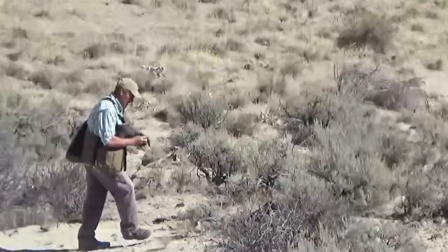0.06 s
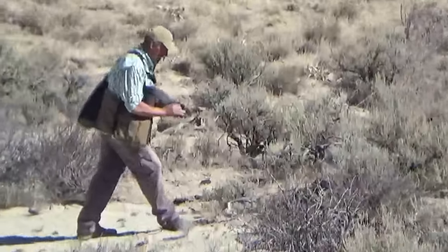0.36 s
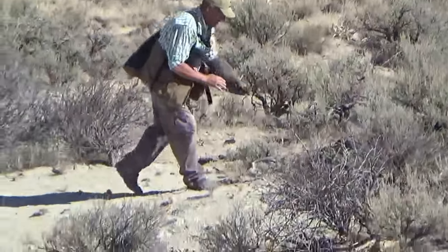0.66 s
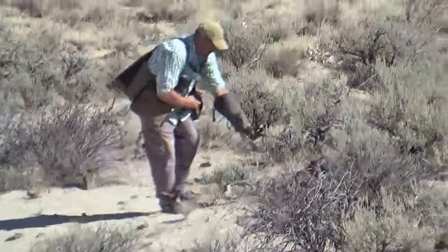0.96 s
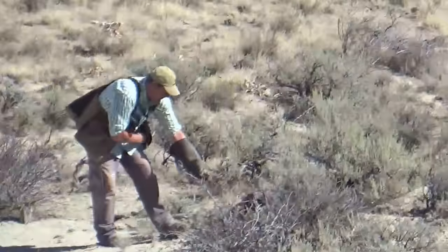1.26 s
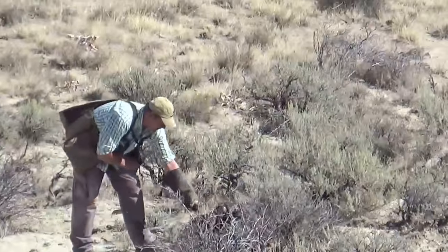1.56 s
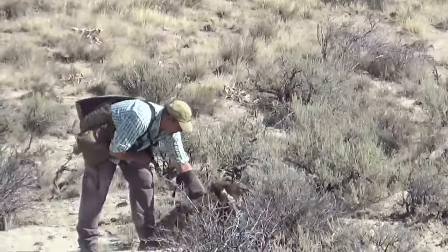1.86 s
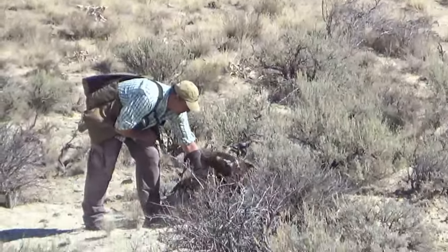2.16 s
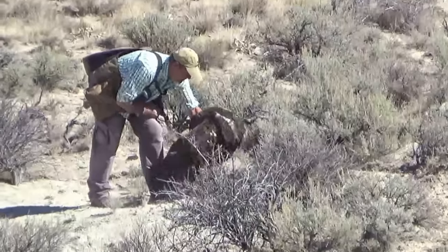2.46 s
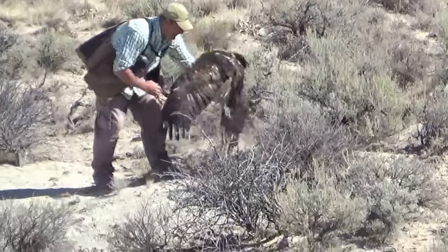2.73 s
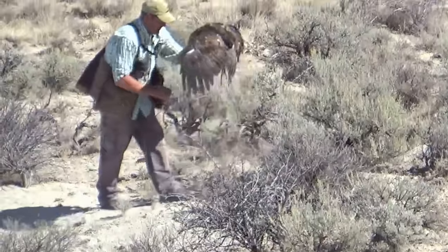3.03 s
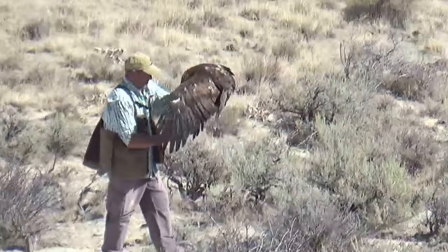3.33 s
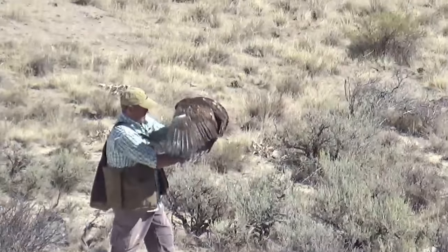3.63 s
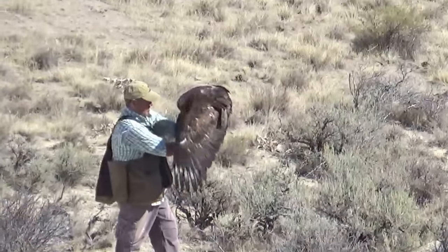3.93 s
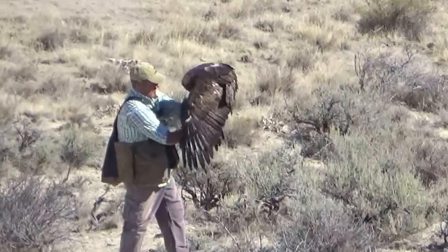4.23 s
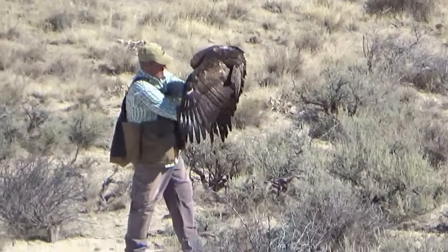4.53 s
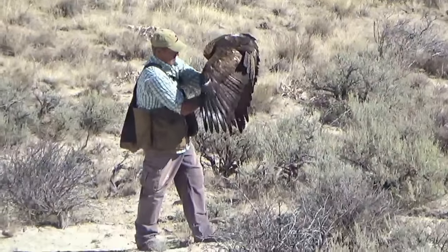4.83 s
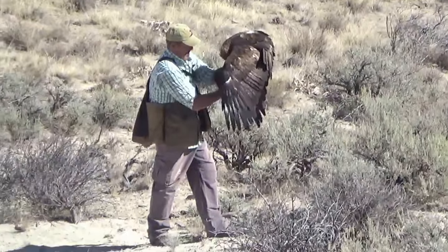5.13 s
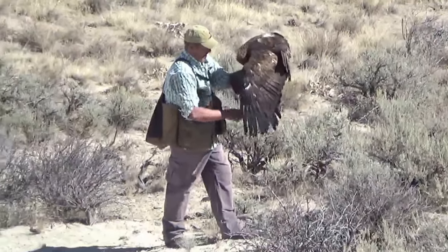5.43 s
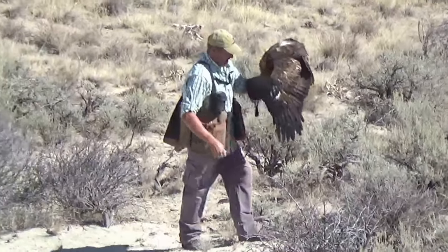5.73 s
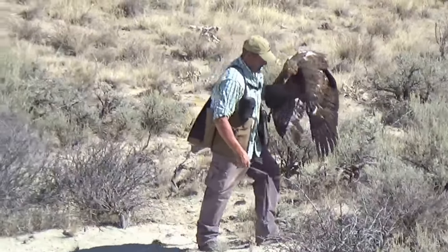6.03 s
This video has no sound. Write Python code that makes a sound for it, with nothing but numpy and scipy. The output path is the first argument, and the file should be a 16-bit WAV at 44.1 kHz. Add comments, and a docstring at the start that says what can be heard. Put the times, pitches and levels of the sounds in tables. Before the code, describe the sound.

On an open hillside, an eagle some way ahead gives a string of thin, rising whistles, sometimes hoarse, most breaking into a short two-step yelp or a few squeals. Gusts rumble and thump unevenly on the close stereo microphone over a soft hiss of open air. Toward the end, feathers rustle against dry brush and twigs tick and snap, and one hard click sounds right at the microphone.

```python
"""An eagle calls as it is lifted out of dry sagebrush, some way off on an open hillside.
Its syrinx gives thin whistles that scoop up and climb, hoarse at times, then break into a two-step
yelp or a few squeals. The bird is straight ahead; twigs snap, and feathers rustle against the brush.
Up close, gusts buffet the spaced ports of the stereo microphone, and one hard click comes at the end.
Behind it all lie the hiss of open air and a faint pulsing swish."""
import sys
import numpy as np
from scipy import signal
from scipy.fft import rfft, irfft
from scipy.io import wavfile

SR = 44100
rng = np.random.default_rng(int(sys.argv[2]) if len(sys.argv) > 2 else 0)


def wav_out(sig):
    """Save sig, one row per channel (or a flat mono array), as 16-bit PCM at SR to the path in sys.argv[1]."""
    wavfile.write(sys.argv[1], SR, np.round(np.clip(np.atleast_2d(sig).T, -1, 1) * 32767).astype(np.int16))


N = 268642
TIME = np.arange(N) / SR
BINS = np.maximum(np.arange(N // 2 + 1) * SR / N, 1)

# Levels in the tables are relative: each source adds its own gain.
# the eagle's whistles: start t/s, end t/s, first f/Hz, middle f/Hz, last f/Hz, waver depth/Hz,
# first level/dB, crest t/s, crest level/dB, last level/dB, first and last roughness/0-1
WHISTLES = [ (-0.1, 0.078, 3470, 3920, 4400, -5, -52, .01, -51, -51, 0, 0.23),
            (0.445, 0.757, 3260, 3440, 3950, -4, -60, 0.6, -49, -44, 0.1, 0.06),
            (1.074, 1.399, 3485, 3740, 4280, 0, -49, 1.36, -47, -47, 0, 0.16),
            (1.699, 1.995, 3890, 4450, 4060, 229, -51, 1.915, -36.5, -37, 0.4, 0),
            (2.263, 2.551, 3830, 4465, 4390, 52, -41.5, 2.37, -43.5, -48, 0.1, 0.37),
            (2.912, 3.206, 3440, 3966, 4610, 0, -44.5, 3.1, -39.5, -38.5, 0.04, .2),
            (3.532, 3.754, 3320, 3530, 3880, 0, -59.5, 3.69, -37, -36.5, 0.1, 0),
            (4.224, 4.524, 3300, 3693, 4270, 0, -59.5, 4.35, -41.5, -48.5, .04, 0.1),
            (5.053, 5.201, 3500, 3890, 4080, 0, -57, 5.15, -55, -55, 0.14, 0.2)]
# resonance of the throat and open bill: f/Hz, gain/dB
THROAT = [(900, -14), (1400, 0), (2300, 1), (3100, 0), (4200, -0.5), (5200, -11.5), (6800, -22),
          (9000, -21), (11000, -53)]
# two-step yelps: t/s, upper step f/Hz, its fall/Hz, its length/s, its level/dB,
# lower step length/s, its level/dB, overtone slope/dB per octave, roughness/0-1
YELPS = [ (0.76, 1978, 40, 0.019, -48, .047, -40.5, -4.5, 0.16),
         (1.412, 2003, 14, .028, -42, 0.044, -41, -2, 0.23),
         (2.011, 1797, 102, .01, -55, .027, -40, -2.5, 0.18),
         (3.224, 2274, 60, 0.034, -30, 0.024, -31, -4, 0.1),
         (4.539, 2279, -37, 0.048, -33.5, 0.0318, -39, -3.5, .12),
         (5.333, 2285, 352, 0.024, -41.5, 0.024, -50, 2.5, 0.15)]
# squeals and stray short notes: start t/s, end t/s, first f/Hz, last f/Hz, level/dB,
# overtone slope/dB per octave, roughness/0-1
SQUEALS = [ (0.094, 0.143, 2970, 2510, -48, 0, 0.37), (2.041, 2.062, 1136, 1036, -45, -6, 0.68),
           (2.557, 2.589, 3580, 3820, -47.5, -3, 0.36), (2.598, 2.621, 3310, 3360, -37, -11, 0.24),
           (2.624, 2.643, 3090, 2900, -29.5, -10, .08), (3.758, 3.814, 3550, 3330, -44.5, -11, 0.76),
           (3.818, 3.857, 3150, 3270, -43, -6, 0.48), (3.867, 3.884, 3295, 3280, -31, -17, 0.17),
           (3.866, 3.878, 2460, 2480, -45, -8, .05), (3.889, 3.903, 3270, 2780, -27, -8, 0.14),
           (3.912, 3.935, 2644, 2215, -25.5, -9, 0.13), (4.773, 4.796, 4880, 4740, -27.5, -3, .1),
           (4.969, 5.016, 4440, 4530, -53, 14, 0.3), (5.139, 5.191, 4600, 4560, -44.5, 10, 0.56),
           (5.237, 5.279, 4440, 4260, -37.5, -17, 0.08), (5.289, 5.326, 3090, 3075, -44.5, 0, .2),
           (5.367, 5.396, 1130, 1050, -38.5, -25, 0.74)]
# returns from ground and bushes: delay/s, level/dB
ECHOES = [(.0012, -17.5), (0.01, -16), (0.038, -40)]
# wind on the microphone: t/s, rumble level/dB, flutter level/dB
GUSTS = [(0.0, -36, -47), (0.2, -40.5, -68), (0.33, -32, -60), (0.78, -32, -46.5), (1.02, -43.5, -54),
         (1.17, -36.5, -42), (1.4, -41.5, -51), (1.52, -49.5, -60), (2.15, -48.5, -75), (2.25, -37, -68),
         (2.75, -36, -49), (3.35, -37, -36.5), (3.68, -31.5, -50.5), (3.8, -42, -53), (4.1, -47.5, -48),
         (4.48, -46, -48), (4.8, -37, -44), (5.16, -36, -31), (5.23, -42.5, -42.5), (5.38, -40.5, -79),
         (5.49, -28, -38), (5.76, -32.5, -29.5), (6.07, -40, -41)]
# the strongest buffets: t/s, peak level/dB, centre f/Hz
BUFFETS = [(0.303, -15.5, 244), (0.67, -14, 192), (0.956, -21.5, 167), (1.135, -21, 216), (1.223, -21, 190),
           (1.278, -22.5, 202), (1.645, -24.5, 166), (2.342, -22, 151), (2.429, -24, 160),
           (2.53, -17.5, 262), (2.696, -11, 228), (2.708, -18, 257), (2.786, -19, 189), (2.968, -20, 218),
           (3.241, -18, 260), (3.299, -18.5, 323), (3.432, -20.5, 266), (4.59, -19.5, 193),
           (4.644, -19.5, 250), (4.749, -10, 251), (4.896, -19, 282), (4.957, -20, 257), (5.052, -17, 287),
           (5.105, -16, 390), (5.148, -14.5, 287), (5.48, -18, 183), (5.505, -15, 214), (5.681, -11, 252),
           (5.731, -14, 298), (5.767, -14.5, 252), (5.898, -18.5, 285), (5.942, -15.5, 280)]
# spectra of large, middling and small eddies: f/Hz, level/dB
SWELL_SPECTRUM = [(10, 2), (25, -5.5), (60, 9), (90, 5), (140, -9), (300, -82)]
RUMBLE_SPECTRUM = [(20, -27), (55, -17.5), (90, 0.5), (130, 0), (190, -2.5), (280, -13), (420, -21.5),
                   (800, -70)]
FLUTTER_SPECTRUM = [(120, -10), (220, 6.5), (320, 5.5), (500, -6), (800, -12), (1400, -23), (2500, -31.5),
                    (5000, -52)]
# wind at the left port against the right: f/Hz, phase/rad
PORT_PHASE = [(30, 0.29), (80, 0.72), (170, -1.05), (330, -1.32), (600, -1.8), (1300, -1.86), (2500, -0.69)]
# likeness of left and right, for wind and for airborne sound: f/Hz, correlation/0-1
WIND_LIKENESS = [(30, 0.86), (250, 0.92), (2000, 0.56)]
AIR_LIKENESS = [(400, 0.27), (1200, 0.55), (3000, 0.45), (10000, 0.82)]
# spectra of open air, the background swish and dry brush: f/Hz, level/dB
AIR_SPECTRUM = [(400, 0), (700, -4), (1000, -5.5), (1600, -9.5), (2500, -11.5), (4000, -12.5), (6300, -16),
                (8000, -17.5), (10500, -19.5), (12000, -30)]
SWISH_SPECTRUM = [(400, -25), (700, 4.5), (1000, 7), (1700, 8), (2300, -2), (4000, -59)]
BRUSH_SPECTRUM = [(1000, -19), (2500, 7.5), (5000, 8), (8000, 6), (10500, 11), (12000, 13.5)]
# twigs snapping: t/s, level/dB
SNAPS = [(0.1556, -30.5), (0.1584, -32.5), (0.269, -48), (5.835, -43)]
# ring of a snapped twig: f/Hz, level/dB, t60/s
SNAP_MODES = [(1034, 1, 0.055), (1480, 10.5, 0.006), (1643, 1.5, 0.054), (2053, 7.5, 0.026),
              (2670, 2, 0.017), (3060, 1, 0.014), (3880, 2, 0.015), (5680, -7.5, 0.025)]
# feathers rubbing on brush: t/s, level/dB
RUSTLE = [(4.55, -61), (4.76, -53.5), (5.1, -59), (5.165, -45), (5.24, -48), (5.5, -60), (5.62, -50),
          (5.85, -50.5), (6.05, -51.5)]
# the loudest twig ticks: t/s, level/dB
TWIG_TICKS = [(5.149, -25.5), (5.605, -25), (5.67, -28.5), (5.7966, -24.5), (5.85, -27), (5.8688, -33)]
# ring of the click at the microphone: f/Hz, level/dB, t60/s
CLICK_MODES = [(2700, -19, .007), (4800, -22, .005), (7600, -23, .004), (10300, -13, .008)]


def from_db(db):
    """Decibels to gain."""
    return 10 ** (np.asarray(db) / 20)


def unit_rms(x):
    """Scale to unit power."""
    return x / np.sqrt(np.mean(x ** 2) + 1e-20)


def in_time(rows, t=TIME):
    """Columns of a curve, joined by straight lines."""
    times, *columns = np.transpose(rows)
    return [np.interp(t, times, column) for column in columns]


def at_hz(points, hz):
    """Read a spectrum on a log-frequency axis."""
    f, value = np.transpose(points)
    return np.interp(np.log(hz), np.log(f), value)


def drift(rate_hz, size=N):
    """Smooth random wander with spread 1."""
    lowpass = signal.butter(2, rate_hz, fs=SR, output="sos")
    return unit_rms(signal.sosfilt(lowpass, rng.standard_normal(size + SR // 10))[-size:])


def stereo_noise(spectrum, likeness):
    """Coloured noise whose two sides are partly alike."""
    mid, side = rfft(rng.standard_normal((2, N)))
    alike = at_hz(likeness, BINS)
    left_right = np.sqrt(1 + alike) * mid + np.sqrt(1 - alike) * side * [[1], [-1]]
    return unit_rms(irfft(left_right * from_db(at_hz(spectrum, BINS)), N))


def gate(t, start, end, edge_s):
    """Smooth opening and closing of a note."""
    return (1 + np.tanh((t - start) / edge_s)) * (1 + np.tanh((end - t) / edge_s)) / 4


def around(start, end, margin_s=.02):
    """Samples of an event with a margin on both sides."""
    return slice(max(int((start - margin_s) * SR), 0), int((end + margin_s) * SR))


def random_times(per_s, count=150):
    """Unevenly spaced moments at a mean rate, each with two random values of spread 1."""
    times = np.cumsum(rng.gamma(2, .5, count)) / per_s
    return [(s, *chance) for s, chance in zip(times, rng.standard_normal((count, 2))) if s < TIME[-1]]


def struck(s, modes):
    """Damped modes ringing out from one instant."""
    out, at = np.zeros(N), int(s * SR)
    t = TIME[:min(SR // 10, N - at)]
    for hz, db, t60 in modes:
        out[at:at + len(t)] += from_db(db - 60 * t / t60) * np.sin(2 * np.pi * (hz * t + rng.random()))
    return out


def syrinx(hz, rough, jitter, shimmer, flutter_hz, rattle=0.18, rattle_hz=76, waver=0.005):
    """Phase and strength of the vibrating membrane; roughness shakes both, at worst into a rattle."""
    size = len(hz)
    shake = rough ** 3 * np.sin(2 * np.pi * (rattle_hz * TIME[:size] + rng.random()))
    bend = jitter * rough * drift(flutter_hz, size) + waver * drift(44.4, size) + rattle * shake
    strength = 1 + shimmer * rough * drift(flutter_hz, size) - shake / 2
    return 2 * np.pi * np.cumsum(hz * (1 + bend)) / SR, unit_rms(strength)


def whistles(gain_db=-1.5, octave_db=-3, octave_follows=0.76, twin_above_hz=375, twin_db=-18):
    """Nearly pure rising tones from the syrinx, with a faint twin and an octave that swells less."""
    scoop_hz, scoop_db, scoop_s = 448, 0.5, .015   # each starts flat and weak, then slides up
    waver_period_s, waver_crest_s = .114, .052
    unsteady_db, unsteady_hz = 2.54, 11
    out = np.zeros(N)
    for (start, end, first_hz, middle_hz, last_hz, waver_hz,
         first_db, crest_s, crest_db, last_db, first_rough, last_rough) in WHISTLES:
        span = around(start, end)
        t = TIME[span]
        age = np.maximum(t - start, 0)
        progress = np.clip(age / (end - start), 0, 1)
        scoop = np.exp(-age / scoop_s)
        climb = (last_hz - first_hz) * (progress - .5)
        arch = ((first_hz + last_hz) / 2 - middle_hz) * (2 * progress - 1) ** 2
        waver = waver_hz * np.cos(2 * np.pi * (age - waver_crest_s) / waver_period_s)
        hz = middle_hz + climb + arch + waver - scoop_hz * scoop
        db = np.interp(t, [start, crest_s, end], [first_db, crest_db, last_db])
        db += unsteady_db * drift(unsteady_hz)[span] - scoop_db * scoop
        rough = first_rough + (last_rough - first_rough) * progress
        phase, strength = syrinx(hz, rough, jitter=0.0285, shimmer=1.7, flutter_hz=223)
        twin_phase, twin_strength = syrinx(hz + twin_above_hz, rough=0.515,
                                           jitter=0.0384, shimmer=2.6, flutter_hz=234)
        overtone_db = db.mean() + octave_follows * (db - db.mean()) + at_hz(THROAT, 2 * hz) + octave_db
        tone = strength * (from_db(db) * np.sin(phase) + from_db(overtone_db) * np.sin(2 * phase))
        twin = twin_strength * from_db(db + twin_db) * np.sin(twin_phase)
        out[span] += from_db(gain_db) * gate(t, start, end, edge_s=0.0015) * (tone + twin)
    return out


def hillside(direct, wet_db=-21, t60=0.14, spread=0.96):
    """Ground and brush send the microphone a few weak echoes and a thin, short tail."""
    t = TIME[:SR // 2]
    decay = rng.standard_normal((2, len(t))) * from_db(-60 * t / t60) * (t > .004)
    mid, side = decay / np.sqrt(np.sum(decay ** 2, axis=1, keepdims=True))
    tail = mid + spread * side * [[1], [-1]]
    echoes = sum(from_db(db) * np.interp(TIME - delay, TIME, direct, left=0) for delay, db in ECHOES)
    return direct + echoes + from_db(wet_db) * signal.fftconvolve(direct[None], tail, axes=1)[:, :N]


def wind(swell_db=-21, swell_follows=0.54, gust_gain_db=2, rumble_lumps_db=3.5, flutter_lumps_db=4):
    """Lumpy turbulence right on the microphone; the spaced ports hear it out of step."""
    rumble_db, flutter_db = in_time(GUSTS)
    lumps = drift(70)
    # the largest eddies roll on even between gusts
    swell = from_db(swell_db + swell_follows * rumble_db) * stereo_noise(SWELL_SPECTRUM, WIND_LIKENESS)
    rumble = unit_rms(stereo_noise(RUMBLE_SPECTRUM, WIND_LIKENESS) * from_db(rumble_lumps_db * lumps))
    flutter = unit_rms(stereo_noise(FLUTTER_SPECTRUM, WIND_LIKENESS) * from_db(flutter_lumps_db * lumps))
    gusts = from_db(gust_gain_db) * (from_db(rumble_db) * rumble + from_db(flutter_db) * flutter)
    port_shift = np.exp(.5j * at_hz(PORT_PHASE, BINS) * [[1], [-1]])
    return irfft(rfft(swell + gusts + buffets()) * port_shift, N)


def eddies(per_s=8.9, over_gust_db=11, scatter_db=1.5, centre_hz=196, spread_octaves=.25):
    """Lesser buffets at random moments, following the strength of the gust that carries them."""
    return [(s, in_time(GUSTS, s)[0] + over_gust_db + scatter_db * size,
             centre_hz * 2 ** (spread_octaves * speed)) for s, size, speed in random_times(per_s)]


def buffets(cycles=1.167, gain_db=0.1, tear=0.27, steepening=0.17, tearing_hz=225):
    """An eddy hits the ports with a swing or two of pressure; small fast ones quicken and tear."""
    out = np.zeros(N)
    torn = stereo_noise(FLUTTER_SPECTRUM, WIND_LIKENESS)[0]
    for (s, db, hz), offset in zip(BUFFETS + eddies(), rng.random(200)):
        span = around(s, s)
        violence = min((hz / tearing_hz) ** 3, 2)
        turns = (TIME[span] - s) * hz
        crest = np.exp(-(turns / cycles) ** 2)
        swing = np.sin(2 * np.pi * (turns + steepening * violence * turns ** 2 + offset))
        out[span] += from_db(db + gain_db) * crest * swing * (1 + tear * violence * torn[span])
    return out


def open_air(level_db=-52.5):
    """The steady, wide hiss of the open hillside."""
    return from_db(level_db) * stereo_noise(AIR_SPECTRUM, AIR_LIKENESS)


def swish(level_db=-55, rate_hz=6.33, crest_s=1.83, sharpness=6.8):
    """A soft midrange hush pulsing in the background."""
    swelling = (1 + np.cos(2 * np.pi * rate_hz * (TIME - crest_s))) / 2
    return from_db(level_db) * swelling ** sharpness * stereo_noise(SWISH_SPECTRUM, AIR_LIKENESS)


def yelp_notes(lower_ratio=.68, overlap_s=0.0092, sag_per_s=2.28, crack_db=-6, crack_rough=0.41):
    """A yelp is a downward crack, an upper step and a sagging lower step; rows as in SQUEALS."""
    notes = []
    for s, hz, fall_hz, upper_s, upper_db, lower_s, lower_db, slope_db, rough in YELPS:
        drop_s = s + upper_s - overlap_s
        low_hz = hz * lower_ratio
        sag = sag_per_s * lower_s / 2
        crack = (s - .0121, s - .0055, hz * 1.85, hz * 1.425, upper_db + crack_db, slope_db, crack_rough)
        upper = (s, s + upper_s, hz + fall_hz / 2, hz - fall_hz / 2, upper_db, slope_db, rough)
        lower = (drop_s, drop_s + lower_s, low_hz * (1 + sag), low_hz * (1 - sag),
                 lower_db, slope_db, rough)
        notes += [crack, upper, lower]
    return notes


def yelps_and_squeals(sum_tone_db=-2, rasp_db=-9, creak_db=3, creak_below_hz=2400, top_hz=11000):
    """The voice breaks between registers; overlapping notes mix into a sum tone and crack into rasp."""
    out, earlier = np.zeros(N), np.zeros(N, complex)
    rasp_band = signal.butter(2, [2600, 5200], "band", fs=SR, output="sos")
    rasp = unit_rms(signal.sosfilt(rasp_band, rng.standard_normal(N)))
    for start, end, first_hz, last_hz, db, slope_db, rough in yelp_notes() + SQUEALS:
        span = around(start, end)
        t = TIME[span]
        hz = np.interp(t, [start, end], [first_hz, last_hz])
        middle_hz = (first_hz + last_hz) / 2
        phase, strength = syrinx(hz, rough, jitter=0.038, shimmer=0.87, flutter_hz=236)
        level = from_db(db) * gate(t, start, end, edge_s=0.0036) * strength
        # overtones bloom only once the previous register has let go
        bloom = np.abs(level) / (np.abs(level) + 2 * np.abs(earlier[span]) + 1e-9)
        # every other cycle is stronger in a low, rough note: half-order tones between the overtones
        creak = from_db(creak_db) * rough / 2 * (middle_hz < creak_below_hz)
        for k in range(1, 8):
            if k * middle_hz < top_hz:
                partial = np.sin(k * phase) + creak * np.sin((k + .5) * phase)
                colour = from_db(at_hz(THROAT, k * hz) + slope_db * np.log2(k))
                out[span] += level * colour * partial * (bloom if k > 1 else 1)
        tone = level * np.exp(1j * phase)
        sum_tone = tone * earlier[span] / (np.abs(tone) + np.abs(earlier[span]) + 1e-9)
        out[span] += 2 * from_db(sum_tone_db + at_hz(THROAT, 2 * hz)) * sum_tone.real
        out[span] += from_db(rasp_db) * (rough * level + np.abs(sum_tone)) * rasp[span]
        earlier[span] += tone
    return out


def twig_snaps(ring_db=-4, crack_db=-7, crack_t60=0.012):
    """A twig breaks with a brief crack and a dry woody ring."""
    out, t = np.zeros(N), TIME[:SR // 20]
    for s, db in SNAPS:
        at = int(s * SR)
        out += from_db(db + ring_db) * struck(s, SNAP_MODES)
        out[at:at + len(t)] += from_db(db + crack_db - 60 * t / crack_t60) * rng.standard_normal(len(t))
    return out


def brush_rustle(grain_db=3, ticks_per_s=24, tick_gain_db=-7, tick_t60=0.019, scatter_db=3):
    """Feathers rub grainily on dry stems, and single twigs tick as the brush is stirred."""
    level = from_db(in_time(RUSTLE)[0]) * unit_rms(from_db(grain_db * drift(520)))
    small_ticks = [(s, in_time(RUSTLE, s)[0] + 13 + scatter_db * size)   # these ride above the rustle
                   for s, size, _ in random_times(ticks_per_s)]
    for s, db in TWIG_TICKS + small_ticks:
        span = slice(int(s * SR), int(s * SR) + SR // 20)
        level[span] += from_db(db + tick_gain_db - 60 * (TIME[span] - s) / tick_t60)
    return level * stereo_noise(BRUSH_SPECTRUM, AIR_LIKENESS)


def close_click(at_s=6.0848):
    """One hard click right at the microphone, ringing for a few milliseconds."""
    return struck(at_s, CLICK_MODES)


def scene():
    """The bird straight ahead and some way off, wind at the microphone, open air all round."""
    eagle = np.sqrt(2) * (whistles() + yelps_and_squeals())
    air = open_air()
    return hillside(eagle + twig_snaps()) + brush_rustle() + wind() + air + swish() + close_click()


def record(dry, cutoff_hz=11000):
    """The recorder cuts the top steeply."""
    return signal.sosfilt(signal.ellip(10, .3, 80, cutoff_hz, fs=SR, output="sos"), dry)


dry = scene()
out = record(dry)
wav_out(out)
```